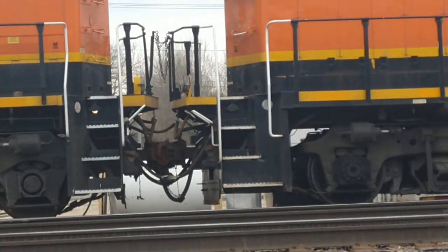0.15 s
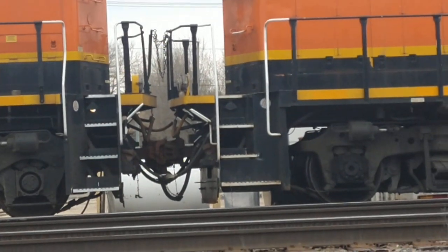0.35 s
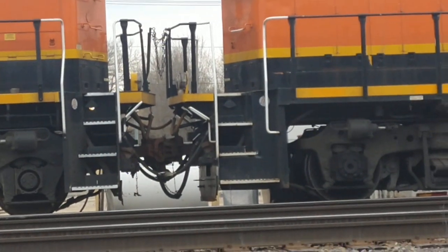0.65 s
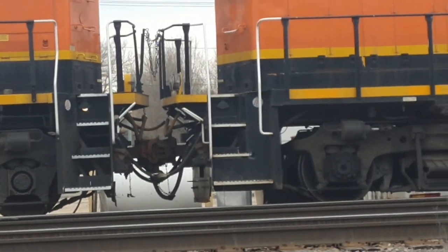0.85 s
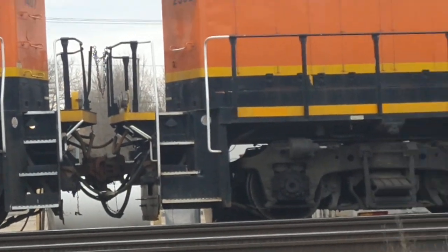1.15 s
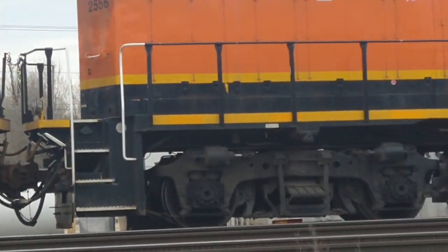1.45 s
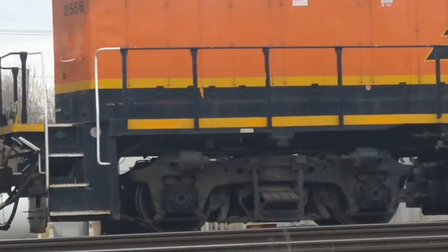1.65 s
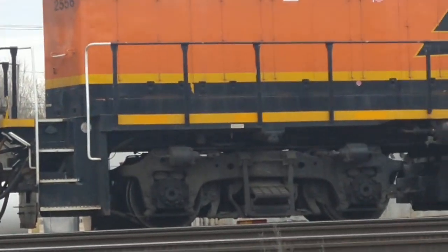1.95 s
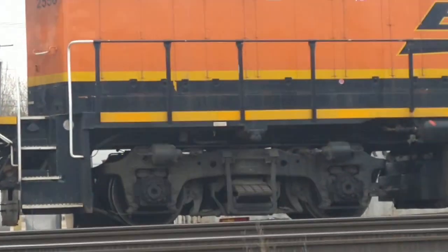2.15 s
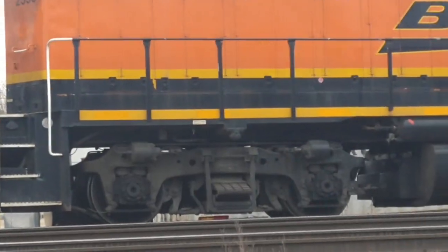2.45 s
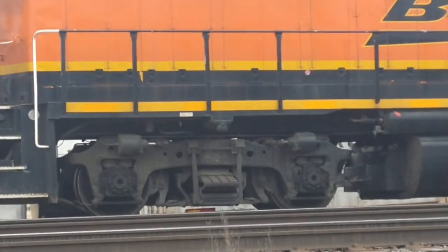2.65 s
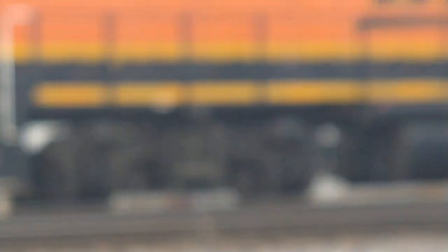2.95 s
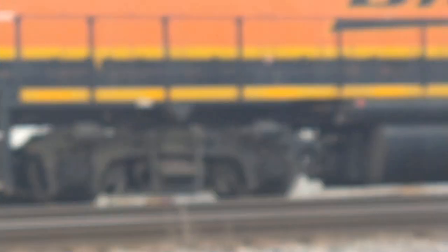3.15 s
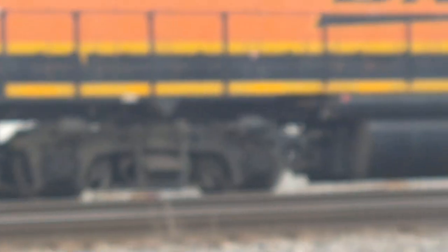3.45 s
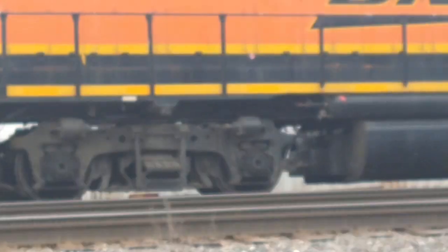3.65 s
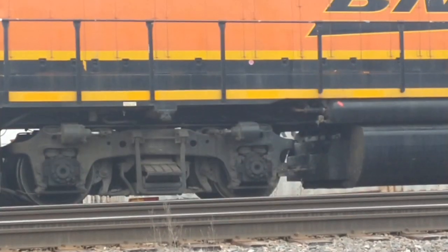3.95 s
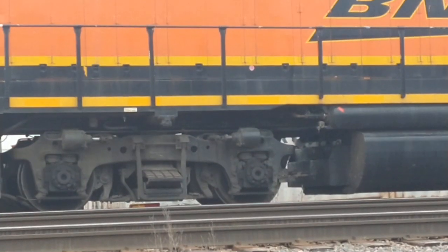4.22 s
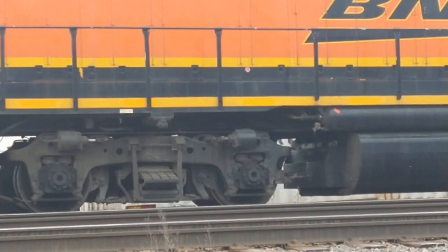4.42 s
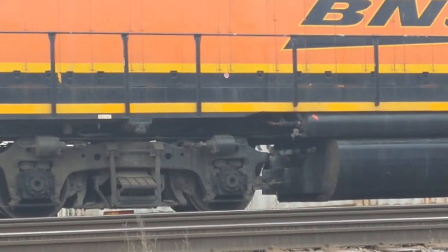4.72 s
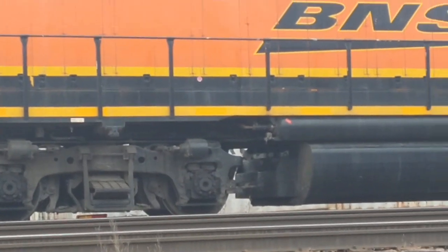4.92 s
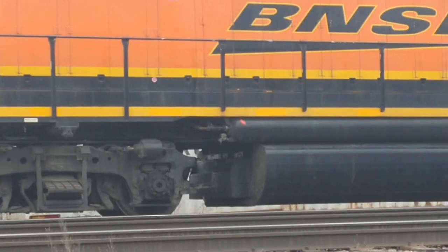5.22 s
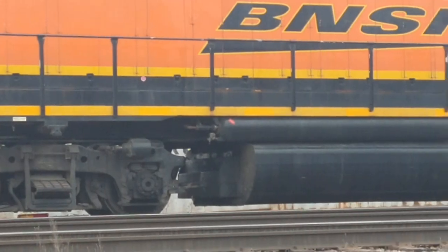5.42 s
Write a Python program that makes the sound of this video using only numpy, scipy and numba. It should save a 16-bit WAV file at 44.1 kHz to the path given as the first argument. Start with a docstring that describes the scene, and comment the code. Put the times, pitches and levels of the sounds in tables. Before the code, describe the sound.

Diesel locomotives idle with a low throbbing rumble and clatter, a valve spits briefly, then a loud compressed-air blast bursts out and dies away amid wind buffeting.

```python
"""Idling locomotives and venting air

Two diesel locomotives idle in a yard, some metres from a hand-held phone: exhaust pulses ring a stack,
sines hum and whine, shaped noise makes the roar and clatter. A valve spits briefly and seeps on; later a
vent hisses open and blasts compressed air that dies away, all as noise through resonances. Gusts, as
bursts and short swings, buffet the two microphone ports separately, the left one harder."""
import sys
import numpy as np
from scipy import signal
from scipy.fft import rfft, irfft
from scipy.io import wavfile
from scipy.ndimage import uniform_filter1d
from numba import njit

SR = 44100
rng = np.random.default_rng(int(sys.argv[2]) if len(sys.argv) > 2 else 0)


def to_wav(sig):
    """Store sig (one row per channel, or 1-D mono) as 16-bit WAV at the path in sys.argv[1].

    Samples outside -1..1 are clipped; the rate is SR.
    """
    pcm = np.clip(np.atleast_2d(sig), -1, 1) * 32767
    pcm = np.round(pcm).astype(np.int16)
    wavfile.write(sys.argv[1], SR, pcm.T)  # frames by channels


N = 246078
T = np.arange(N) / SR  # time in s
F = np.maximum(np.arange(N // 2 + 1) * SR / N, 1.)  # frequency bins in Hz


def undb(db):
    """Amplitude factor of a level in dB."""
    return 10 ** (np.asarray(db) / 20)


def level(x, db):
    """Scale a sound to an rms level in dB."""
    return x * undb(db) / np.sqrt(np.mean(x ** 2))


def curve(rows):
    """Interpolate the columns of (time_s, ..) rows to one value a sample."""
    s, *columns = np.transpose(rows)
    return [np.interp(T, s, c) for c in columns]


def over_hz(points):
    """Values of (pitch_hz, value) points at every frequency bin, flat outside the ends."""
    hz, value = np.transpose(points)
    return np.interp(np.log(F), np.log(hz), value)


def density(points):
    """Gain that turns unit noise into the given dB per Hz, falling 20 dB an octave outside the ends."""
    octaves_below = np.maximum(np.log2(points[0][0] / F), 0)
    octaves_above = np.maximum(np.log2(F / points[-1][0]), 0)
    return undb(over_hz(points) - 20 * (octaves_below + octaves_above)) * np.sqrt(SR / 2)


def bell(hz, width):
    """Resonance shape over frequency: 1 at its centre, half at half a width to either side."""
    return 1 / (1 + (2 * (F - hz) / width) ** 2)


def boosts(peaks):
    """Summed dB of (pitch_hz, width_hz, boost_db) resonances at every frequency bin."""
    return sum(db * bell(hz, width) for hz, width, db in peaks)


def walk(rate):
    """Random levels held for 1 / rate s and smoothed twice; spread near 1."""
    k = int(SR / rate)
    steps = np.repeat(rng.standard_normal(N // k + 1), k)
    return 1.37 * uniform_filter1d(uniform_filter1d(steps, k), k)[:N]


@njit
def svf(x, hz, width):
    """State-variable band-pass whose centre may move."""
    y, b, l = np.empty(len(x)), 0., 0.  # b, l: the two integrator states
    for i in range(len(x)):
        g, k = np.tan(np.pi * hz[i] / SR), width[i] / hz[i]
        v = (b + g * (x[i] - l)) / (1 + g * (g + k))
        b, l, y[i] = 2 * v - b, l + 2 * g * v, k * v
    return y


@njit
def follow(x, attack, release):
    """Envelope that rises fast and falls slowly."""
    y, e = np.empty(len(x)), 0.
    for i in range(len(x)):
        e += (x[i] - e) * (attack if x[i] > e else release)
        y[i] = e
    return y


# how alike both microphone ports hear the yard: pitch_hz, likeness (0-1)
PORT_LIKENESS = [(30, .9), (300, .95), (600, .97), (1000, .82), (1500, .85), (2500, .7), (6000, .62),
                 (8000, .45), (15000, .35)]


def wide_noise(gain, envelope=0.72):
    """Noise for both ports: a direct part that they share and a scattered part of their own."""
    direct, left, right = rfft(rng.standard_normal((3, N)) * envelope)
    like = np.clip(over_hz(PORT_LIKENESS), 0, 1)
    scattered = np.array([left, right])
    return irfft(gain * (np.sqrt(like) * direct + np.sqrt(1 - like) * scattered), N)


def wavering(hz, db, waver_db, rate):
    """A sine whose pitch and level wander a little."""
    phase = 2 * np.pi * (np.cumsum(hz * (1 + 0.002036 * walk(3))) / SR + rng.random())
    return np.sqrt(2) * undb(db + waver_db * walk(rate)) * np.sin(phase)


FIRING_HZ, EXHAUST_DB = 26.87, -48.5  # near engine; rms level ahead of the ports
# strength of the firings in turn, strong and weak: level_db
FIRING_STRENGTHS = [7.5, 1.5]
# resonances of the near engine's exhaust pipe: pitch_hz, width_hz, level_db (relative)
STACK_RESONANCES = [(73.7, 16, -1), (118.3, 26, 1), (147.7, 25, -1)]


def exhaust():
    """Slightly uneven firings ring the exhaust stack."""
    count = int(FIRING_HZ * N / SR)
    chance = rng.standard_normal((count, 2))
    at = (np.arange(count) + .5 + 0.016 * chance[:, 0]) / FIRING_HZ
    pulses = np.zeros(N)
    pulses[(at * SR).astype(int)] = undb(np.resize(FIRING_STRENGTHS, count) + 3.5 * chance[:, 1])
    flat = np.ones(N)
    ring = np.zeros(N)
    for hz, width, db in STACK_RESONANCES:
        narrow = svf(pulses, hz * flat, width * flat)
        ring += undb(db) * svf(narrow, hz * flat, 2 * width * flat)
    return level(ring, EXHAUST_DB)


# hum of shafts, blower and generator, ahead of the ports:
# pitch_hz, level_db (rms, before wavering), waver_db (the sign only mirrors the random wander)
HUM_TONES = [(112, -54, -0.5), (134, -63.5, 1.5), (147.2, -53.5, -1), (262.8, -55.5, 0),
             (463.5, -55.5, 6.5), (521.6, -46.5, -2.5), (569, -56, -2.5), (707, -56, 3.5)]


def tones():
    """Shafts, blower and generator hum as wavering sines."""
    return sum(wavering(hz, db, waver_db, 6.054) for hz, db, waver_db in HUM_TONES)


# roar of blocks and fans, ahead of wander and ports: pitch_hz, density_db (per Hz)
ROAR_SPECTRUM = [(25, -82), (40, -99), (58, -68.5), (70, -61.5), (82, -62), (95, -71), (118, -67.5),
                 (134, -68), (152, -64), (185, -87), (230, -81.5), (320, -81), (400, -77), (480, -71.5)]


def rumble():
    """Blocks and fans roar as low noise of wandering level."""
    return wide_noise(density(ROAR_SPECTRUM), undb(1.4 * walk(8)))


KNOCK_HZ, KNOCK_DEPTH = 72.9, 0.098  # mean rate at which injectors and valves knock; share of amplitude
# clatter and fans, ahead of panels, noise scaling and ports: pitch_hz, density_db (per Hz)
CLATTER_SPECTRUM = [(400, -81.5), (500, -70), (720, -67), (900, -72.5), (1300, -75.5), (1700, -83),
                    (2300, -95), (2800, -94), (3600, -102), (5000, -108), (7000, -108), (8000, -116),
                    (10000, -114), (15800, -126)]
# hood panels that ring with the clatter: pitch_hz, width_hz, boost_db
HOOD_PANELS = [(780.4, 6.9, 6.5), (1063, 36, 6), (1260, 10, -1), (1450, 24, 6.5), (1597, 24, 8.5),
               (1860, 43, 7), (2300, 39, 0), (2520, 180, 2), (2800, 330, 4.5)]


def clatter_and_fans():
    """Deeper clatter throbs with injectors and valves; the fans above it are even noise."""
    phase = 2 * np.pi * np.cumsum(KNOCK_HZ * (1 + 0.016 * walk(3.78))) / SR
    knock = 1 + KNOCK_DEPTH * np.sin(phase)
    deep = 1 / (1 + (F / 2200) ** 4)  # share of the power that throbs
    colour = density(CLATTER_SPECTRUM) * undb(boosts(HOOD_PANELS))
    clatter = wide_noise(colour * np.sqrt(deep), knock * undb(0.35 * walk(7.7)))
    fans = wide_noise(colour * np.sqrt(1 - deep))
    return clatter + fans


def engines():
    """Exhaust, hum, roar, clatter and fans of the idling engines together."""
    return exhaust() + tones() + rumble() + clatter_and_fans()


WHINE_HZ, WHINE_START_DB, WHINE_PAN_DB = 2930, -71, -3  # level before wavering; left minus right
WHINE_FADE_DB_S = 2  # dB lost a second as the phone turns away
SECOND_WHINE_HZ, SECOND_WHINE_DB = 3160, -14  # the other turbocharger, relative level


def whine():
    """Two turbochargers whine as thin, fading, wavering sines."""
    db = WHINE_START_DB - WHINE_FADE_DB_S * T
    first = wavering(WHINE_HZ, db, 2.9, 12.6)
    second = wavering(SECOND_WHINE_HZ, db + SECOND_WHINE_DB, 3.5, 12)
    return (first + second) * undb(np.array([[WHINE_PAN_DB], [-WHINE_PAN_DB]]) / 2)


# colour of escaping air: pitch_hz, level_db (relative)
JET_COLOUR = [(500, -24.5), (800, -16), (1500, -6), (2500, -4.5), (4200, -0.5), (6000, -2.5), (8000, -4),
              (10000, -4.5), (13500, -10.5), (15800, -15)]


def jet(peaks, low_db, high_db):
    """Turbulent air as noise through resonances, its low roar and treble raised by their own amounts."""
    colour = undb(over_hz(JET_COLOUR) + boosts(peaks)) * (F > 300)
    sound = rfft(level(wide_noise(colour, undb(0.64 * walk(9))), 0))
    low, high = 1 / (1 + (F / 1900) ** 6), 1 / (1 + (7500 / F) ** 6)
    middle = irfft(sound * (1 - low - high), N)
    return undb(low_db) * irfft(sound * low, N) + middle + undb(high_db) * irfft(sound * high, N)


ROAR_PER_DB, TREBLE_PER_DB = 0.3255, -0.34  # change for each dB that the flow has sunk from its peak


def release(flow_db, pan_db, peaks, low_db, high_db):
    """Air through one opening; as the flow sinks it turns darker."""
    sunk = np.maximum.accumulate(flow_db) - flow_db
    hiss = jet(peaks, low_db + ROAR_PER_DB * sunk, high_db + TREBLE_PER_DB * sunk)
    return hiss * undb(flow_db + np.array([pan_db, -pan_db]) / 2)


# flow of the spit, ahead of resonance boosts and ports: time_s, level_db
SPIT_FLOW = [(1.15, -74), (1.2, -56), (1.27, -48.5), (1.326, -51), (1.396, -62.5), (1.46, -64)]
# resonances and hollows of the small valve: pitch_hz, width_hz, boost_db
SPIT_RESONANCES = [(2600, 370, 9), (3550, 300, 1.5), (5200, 340, -3), (6150, 320, 3)]


def valve_spit():
    """A small valve lets out a short jet, roar and treble raised at full flow."""
    before, after = (SPIT_FLOW[0][0] - .02, -95), (SPIT_FLOW[-1][0] + 0.21, -95)
    flow_db = curve([before, *SPIT_FLOW, after])[0]
    return release(flow_db, np.full(N, 1.), SPIT_RESONANCES, 7, 1.5)  # left is 1 dB louder


# colour of the seep, ahead of gap, noise scaling, flow and ports: pitch_hz, density_db (per Hz)
SEEP_SPECTRUM = [(2000, -102), (2500, -88.5), (3300, -99), (4000, -104), (4800, -102), (5300, -105),
                 (5900, -102.5), (7000, -106), (9000, -120), (12000, -128)]
# flow of the seep: time_s, level_db (relative)
SEEP_FLOW = [(1.2, -30), (1.4, -1.5), (2.0, -1.5), (3.0, -3), (3.9, -4.5), (4.3, -26)]
# resonances of the narrow gap: pitch_hz, width_hz, boost_db
GAP_RESONANCES = [(2270, 450, 9), (4560, 420, 8.1), (5810, 260, 8.3)]


def seep():
    """The valve leaks on as quiet resonant noise."""
    colour = density(SEEP_SPECTRUM) * undb(boosts(GAP_RESONANCES))
    return undb(curve(SEEP_FLOW)[0]) * wide_noise(colour)


GUST_EDGE_DB_S, CALM_DB = 508, -62  # how fast a gust comes and goes; the stir between gusts
# gusts over the phone, ahead of the capsule band: start_s, end_s, level_db (rms), port (0 left, 1 right)
PORT_GUSTS = [(1.48, 1.523, -31.5, 0), (1.54, 1.565, -29, 0), (1.666, 1.86, -37.5, 1),
              (1.805, 1.837, -27, 0), (1.865, 1.9, -24.5, 0), (1.91, 1.956, -24.5, 0), (1.972, 2.0, -28, 0),
              (2.244, 2.26, -31.5, 0), (3.835, 4.1, -42.5, 0), (4.476, 4.49, -29.5, 0),
              (4.639, 4.72, -28, 0), (4.626, 4.7, -34.5, 1), (4.805, 4.84, -27.5, 0),
              (4.862, 4.894, -26, 0), (5.013, 5.03, -28, 0), (5.045, 5.06, -23, 0), (5.108, 5.144, -23, 0),
              (5.11, 5.19, -35, 1), (5.18, 5.29, -23, 0), (5.2, 5.26, -28.5, 1), (5.293, 5.47, -22, 0),
              (5.304, 5.34, -29.5, 1), (5.418, 5.52, -29.5, 1), (5.485, 5.6, -20, 0)]


def gust_db():
    """Force of the wind on each port: every gust rises, holds and drops."""
    db = np.full((2, N), float(CALM_DB))
    for start, end, top_db, port in PORT_GUSTS:
        side = int(round(port))
        seconds_outside = np.maximum(0, np.maximum(start - T, T - end))
        db[side] = np.maximum(db[side], top_db - GUST_EDGE_DB_S * seconds_outside)
    return db


def gust(db):
    """Turbulence at one port: bursts whose pitch rises with their force, pushes sharper than pulls."""
    burst_db = 3.5 * np.tanh(walk(30))
    hz = np.clip(140 * undb(0.12 * (db + 5.5) + .5 * burst_db), 40, 600)
    narrow = svf(rng.standard_normal(N), hz, 1.12 * hz)
    x = level(svf(narrow, hz, 2.13 * hz) * undb(burst_db), 0)
    x = x + 0.061 * (x ** 2 - uniform_filter1d(x ** 2, size=600))  # makes pushes sharper
    return level(x, 0) * undb(db)


def lesser_eddies(force):
    """Random small eddies on both ports, their peaks riding on the gust force."""
    rate, peak_db, spread_db, pitch_hz = 45, 3, 1.5, 200  # per s and port; dB over the gust; scatter; pitch
    count = int(rate * N / SR)
    eddies = []
    for port in range(2):
        for s, size, pitch in rng.random((count, 3)) * [T[-1], 1, 1]:
            db = force[port, int(s * SR)] + peak_db - spread_db * np.log(1 - size)
            eddies.append((s, db, pitch_hz * (.7 + .7 * pitch), port))
    return eddies


EDDY_POINT = 0.78  # under 1: the crest of a swing comes to a point
# the strongest eddies, ahead of the capsule band: time_s, peak_db, pitch_hz, port (0 left, 1 right)
STRONG_EDDIES = [(1.51, -24, 170, 0), (1.562, -26, 200, 0), (1.815, -18, 150, 0), (1.861, -5, 293, 0),
                 (1.929, -8, 150, 0), (1.95, -10, 91, 0), (1.983, -19, 190, 0), (5.063, -1, 250, 0),
                 (5.121, -13, 251, 0), (5.246, -8, 280, 1), (5.307, -6.5, 238, 0), (5.324, -12, 190, 0),
                 (5.344, -2, 244, 0), (5.383, -13, 179, 0), (5.417, -3.5, 338, 0), (5.44, -5, 234, 0),
                 (5.456, -15, 179, 1), (5.463, -10, 215, 0), (5.555, -4, 196, 0), (5.577, -3.5, 227, 0)]


def wind():
    """Gusts on both ports with eddies as short swings; only a low band reaches the capsules."""
    force = gust_db()
    out = np.array([gust(db) for db in force])
    for s, db, hz, port in list(STRONG_EDDIES) + lesser_eddies(force):
        near = slice(max(int((s - .03) * SR), 0), int((s + .03) * SR))
        turn = (T[near] - s) * hz  # cycles from the crest
        swing = np.cos(np.pi / 2 * np.abs(4 * turn) ** EDDY_POINT)
        out[int(round(port)), near] += undb(db) * swing * np.exp(-np.abs(turn / .5) ** 1.18)
    return signal.sosfiltfilt(signal.butter(2, [52, 1100], "band", fs=SR, output="sos"), out)


OPENING_PAN_DB = 0.8  # left minus right
# flow as the vent opens, ahead of resonance boosts and ports: time_s, level_db
OPENING_FLOW = [(3.85, -62.5), (3.95, -45.5), (4.02, -40.5), (4.13, -35)]
# resonances and hollows of the half-open vent: pitch_hz, width_hz, boost_db
HALF_OPEN_RESONANCES = [(2300, 92, 8), (3400, 500, 5), (4000, 580, -9), (4660, 280, 10), (5760, 410, 7.5),
                        (6260, 180, 1), (6760, 330, 6), (7240, 120, 8)]


def vent_opening():
    """The half-open vent hisses as a rising jet."""
    flow_db = curve([(OPENING_FLOW[0][0] - .02, -95), *OPENING_FLOW])[0]
    return release(flow_db, np.full(N, OPENING_PAN_DB), HALF_OPEN_RESONANCES, 5.5, 1)


BLAST_START_S = 4.142  # the valve snaps fully open
SURGE_DB, SURGE_S, SNAP_DB, SNAP_S = 8.5, 0.31, 15.5, 0.02  # extra roar and treble at first; decay times
# flow of the blast, ahead of resonance boosts and ports: time_s, level_db, pan_db (left minus right)
BLAST_FLOW = [(4.148, -21.5, 5), (4.182, -11, 1), (4.45, -8.5, -1), (4.7, -12.5, 6), (4.85, -18, 8.5),
              (5.03, -24.5, 5.5), (5.07, -27.5, 2), (5.3, -33.5, 0.5), (5.58, -41, 3.5)]
# resonances and hollows of the pipework: pitch_hz, width_hz, boost_db
PIPE_RESONANCES = [(863, 47, 7), (1020, 45, 3.5), (1488, 140, 7.5), (2400, 110, 1), (2600, 170, 3.5),
                   (2997, 230, 6.5), (3250, 180, 2), (3650, 280, 5), (4340, 81, 5.5), (4650, 350, 7),
                   (4960, 270, -7), (5620, 195, 7.5), (6150, 81, 6.5), (7160, 21, 6), (7200, 160, 3.5)]


def vent_blast():
    """The open vent blasts through the pipework, breaking out with a surge of roar and a snap of treble."""
    first = (BLAST_START_S, OPENING_FLOW[-1][1], OPENING_PAN_DB)
    flow_db, pan_db = curve([first, *BLAST_FLOW])
    since = np.maximum(T - BLAST_START_S, 0)
    low_db = -3 + SURGE_DB * np.exp(-since / SURGE_S)
    high_db = 3 + SNAP_DB * np.exp(-since / SNAP_S)
    return release(flow_db, pan_db, PIPE_RESONANCES, low_db, high_db)


def air():
    """Spit, opening and blast take over from one another; the seep lies beneath them."""
    stage = np.digitize(T, [OPENING_FLOW[0][0] - .02, BLAST_START_S])
    return np.choose(stage, [valve_spit(), vent_opening(), vent_blast()]) + seep()


# the emptying pipe rings on: pitch_hz, width_hz, level_db (relative)
DRAIN_RESONANCES = [(1620, 120, 2), (1850, 200, -2), (3310, 120, -1), (3950, 200, -3), (4450, 160, -1),
                    (6900, 150, -3)]
# level of the last air, ahead of the ports: time_s, level_db (rms)
DRAIN_FLOW = [(4.7, -66), (5.0, -40), (5.3, -37.5), (5.58, -42)]


def drain():
    """The last air sounds as noise mainly in the resonances of the pipe."""
    ring = sum(undb(db) * bell(hz, width) for hz, width, db in DRAIN_RESONANCES)
    return level(wide_noise(ring), 0) * undb(curve(DRAIN_FLOW)[0]) * (T > DRAIN_FLOW[0][0])


def yard_echoes():
    """Random reflections off ballast, rails and underframes comb all but the long waves."""
    span_s, echo_db = .03, -12  # latest delay; level of the strongest possible echo
    echoes = 1
    for s, a in rng.random((14, 2)):
        echoes = echoes + undb(echo_db) * (2 * a - 1) * np.exp(-2j * np.pi * F * span_s * s)
    echoes = echoes / np.sqrt(np.mean(np.abs(echoes) ** 2))
    return 1 + (echoes - 1) / (1 + (900 / F) ** 4)  # long waves pass round the obstacles


RIGHT_LAG_S, BASS_LAG_SHARE = 0.0003398, 0.55  # long waves bend round the phone sooner
CASE_ECHO_S, CASE_ECHO, CASE_FROM_HZ = 0.000357, 0.8, 1930  # inverted reflection beside the right port
# response of the left microphone port: pitch_hz, level_db
LEFT_RESPONSE = [(30, 3.5), (300, 0.5), (600, 0), (950, -2.5), (1200, -7), (1600, 2), (2500, 9), (3600, 5),
                 (5600, 7.5), (7000, 6.5), (8500, -4), (10000, -11), (13500, -7.5), (15800, -23)]


def ports(x):
    """Nearby echoes comb the sound; the left port is resonant, the right one later and combed by the case."""
    lag = RIGHT_LAG_S * (1 - (1 - BASS_LAG_SHARE) / (1 + (F / 1100) ** 4))
    echo = CASE_ECHO / (1 + (CASE_FROM_HZ / F) ** 4) / (1 + (F / 15000) ** 4)
    right = (1 - echo * np.exp(-2j * np.pi * F * CASE_ECHO_S)) * np.exp(-2j * np.pi * F * lag)
    response = irfft(yard_echoes() * np.array([undb(over_hz(LEFT_RESPONSE)), right]), N)
    lead = 1024  # samples kept ahead of the main tap
    taps = np.roll(response, lead, axis=1)[:, :4096]
    return signal.fftconvolve(x, taps, axes=1)[:, lead:lead + N]


def scene():
    """Engines and air through the ports, then whine, wind on the capsules and capsule hiss directly."""
    capsule_hiss = level(rng.standard_normal((2, N)), -81)
    return ports(engines() + air() + drain()) + whine() + wind() + capsule_hiss


def record(dry):
    """Gain control on each channel pulls loud hiss down but spares the bass; peaks clip; the top is cut."""
    top_db, ratio, top_hz = -15.5, 2.5, 15900  # threshold, compression, upper limit
    bright = signal.sosfilt(signal.butter(2, 1000, "high", fs=SR, output="sos"), dry)
    loud = np.array([follow(np.abs(c), .002, .0003) for c in bright])
    gain = np.minimum(1, undb(top_db) / (loud + 1e-9)) ** (1 - 1 / ratio)
    bass = signal.sosfiltfilt(signal.butter(2, 180, fs=SR, output="sos"), dry)
    clipped = np.clip(bass + (dry - bass) * gain, -1, 1)
    steep = signal.ellip(12, .2, 75, top_hz, fs=SR, output="sos")
    return signal.sosfilt(steep, clipped)


dry = scene()
out = record(dry)
to_wav(out)
```